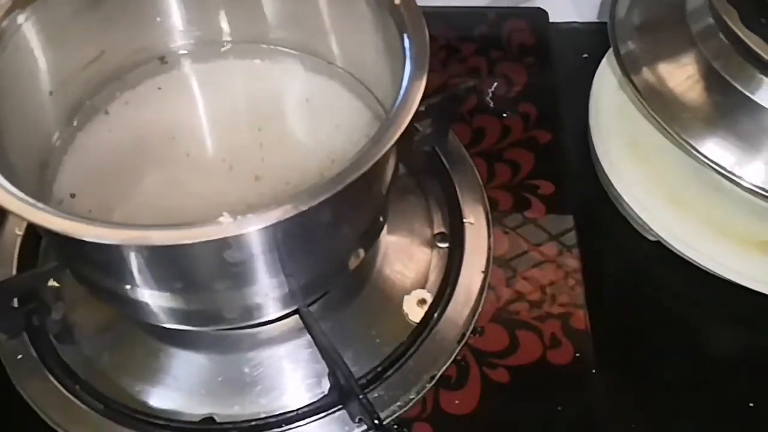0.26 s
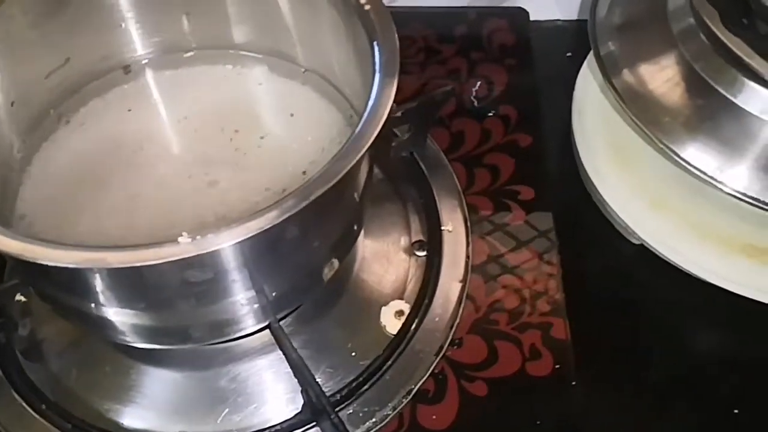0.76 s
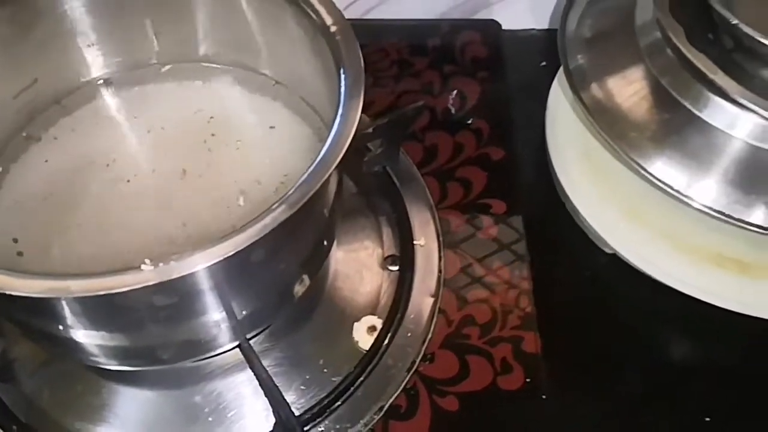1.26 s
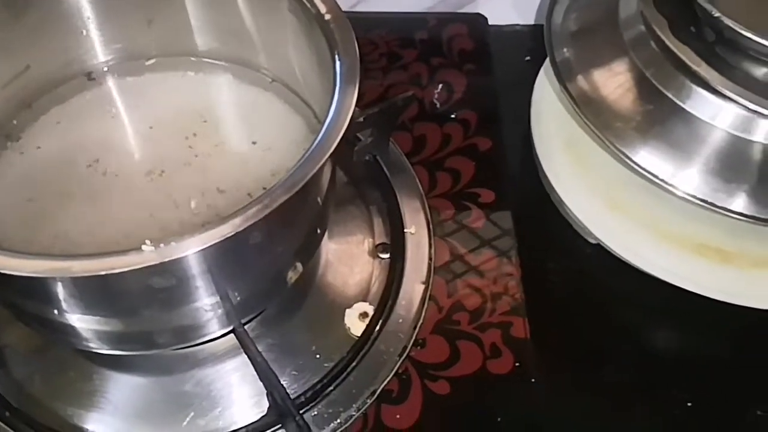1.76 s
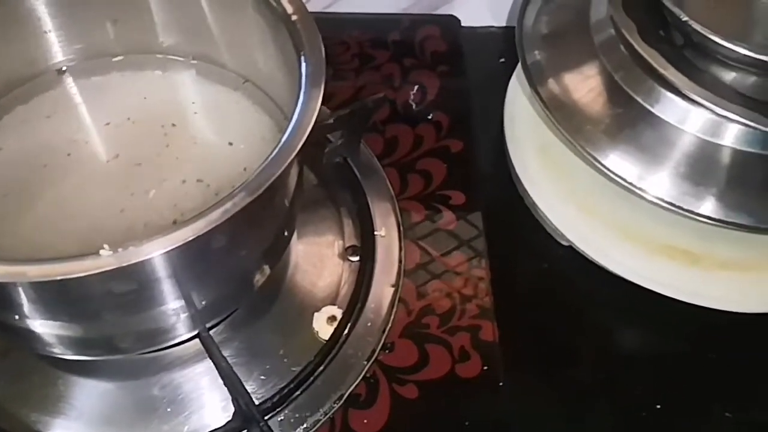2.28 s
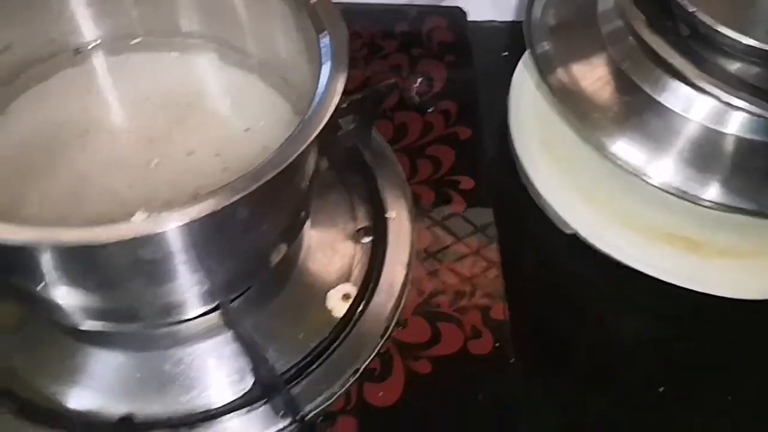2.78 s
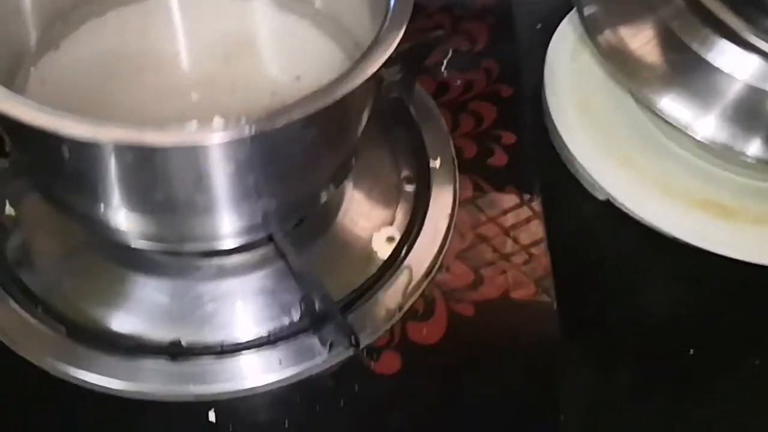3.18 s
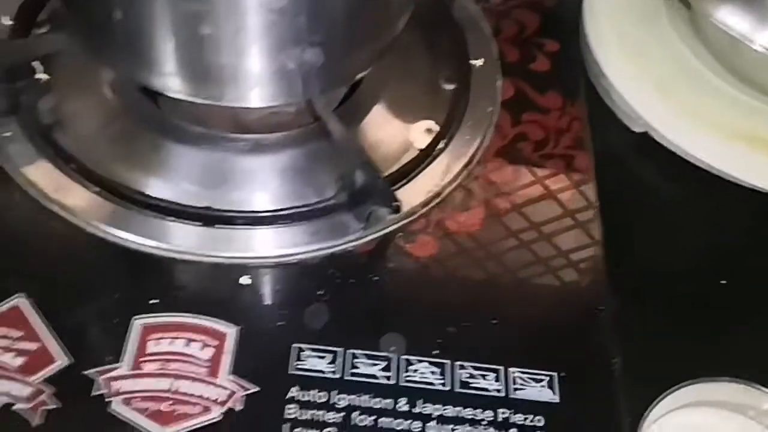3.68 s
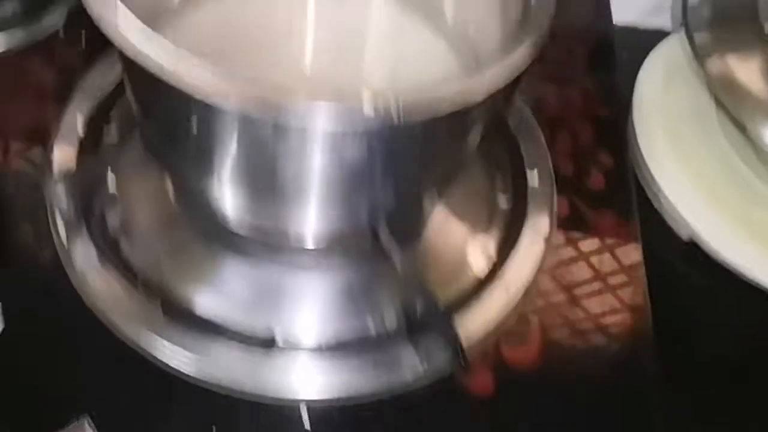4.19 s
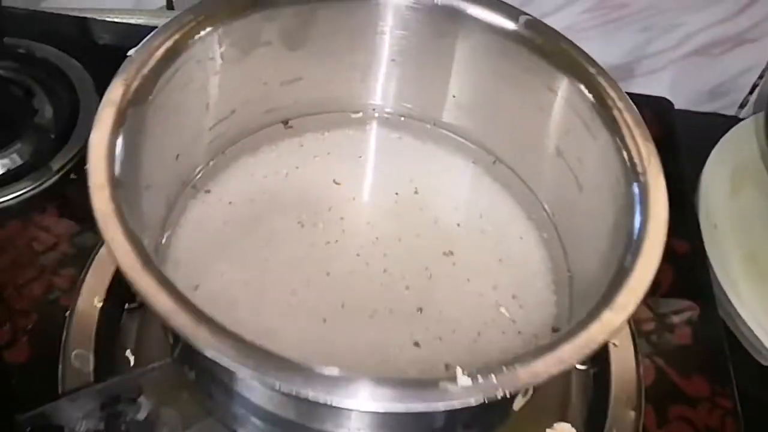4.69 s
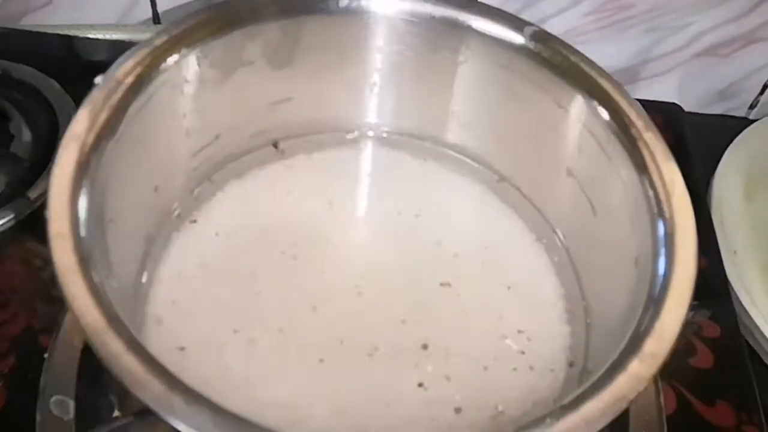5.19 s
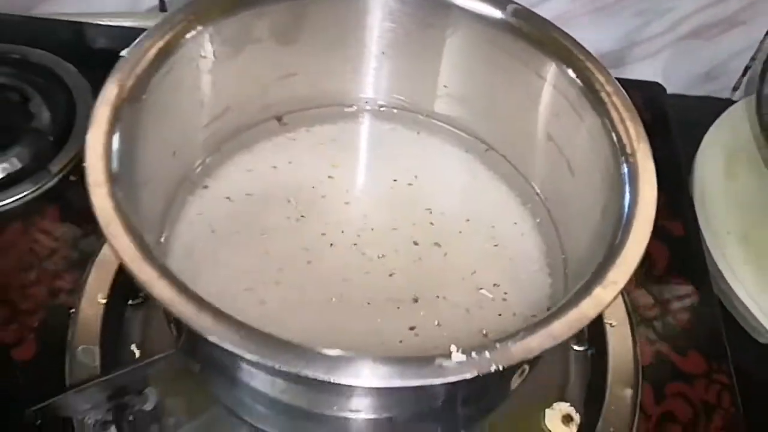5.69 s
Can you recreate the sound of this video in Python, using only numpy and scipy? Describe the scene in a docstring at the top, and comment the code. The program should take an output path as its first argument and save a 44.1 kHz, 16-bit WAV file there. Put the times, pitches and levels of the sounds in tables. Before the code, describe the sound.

Close in a tiled kitchen, sharp metallic igniter snaps and lighter knob clacks lead to a soft low whoomp of gas lighting.

```python
"""In a tiled kitchen, a gas stove is lit close to a mono phone microphone.
The piezo hammer snaps three times and the knob springs back twice: decaying modes and noise cracks with a room tail.
After the third snap the gas catches with a low thud of struck modes, then the flame throbs as a slow sine with rumble.
Ticks, a creak, rubs and a thin hiss surround it; clatter and a scrape sound further off, over soft air and hum."""
import sys
import numpy as np
from scipy import signal
from scipy.fft import rfft, irfft
from scipy.io import wavfile
from scipy.ndimage import uniform_filter1d

SR = 44100
rng = np.random.default_rng(int(sys.argv[2]) if len(sys.argv) > 2 else 0)


def wav_out(sig):
    """Save sig, one row per channel (or a flat mono array), as 16-bit PCM at SR to the path in sys.argv[1]."""
    wavfile.write(sys.argv[1], SR, np.round(np.clip(np.atleast_2d(sig).T, -1, 1) * 32767).astype(np.int16))


N = 262306
TIME = np.arange(N) / SR
AGE = TIME[:SR]  # the second that follows an onset

# reverberation of the kitchen, before stretching: (frequency [Hz], t60 [s])
KITCHEN = [(150, 0.66), (500, 0.6), (2000, 0.54), (4000, 0.42), (7000, 0.35), (14000, 0.32)]
# colour of the steady air: (frequency [Hz], relative level [dB])
AIR_COLOUR = [(15, -32.5), (25, -2), (103, -7.5), (135, -7), (176, -4), (278, -9), (344, -1.5), (383, -12),
              (515, -12), (1180, -5.5), (2240, -10), (3930, -28.5), (5420, -29), (7090, -40.5),
              (15000, -51.5)]
# lines of the faint hum: (frequency [Hz], level [dB])
HUM_LINES = [(188, -64.5), (339, -61)]

# clatter further off: (time [s], level [dB], rise time constant [s], t60 at 2 kHz [s], tilt [dB per octave],
# ring frequency [Hz], thump level [dB])
CLATTERS = [(-.06, -28.5, 0.057, 0.64, -2, 1567, -22.5), (3.305, -22, 0.064, 0.79, -0.5, 2088, -15.5),
            (5.25, -15.5, 0.023, 0.85, 1.73, 2500, -24), (5.875, -31, 0.19, 2.1, -2.5, 1292, -12)]
# colours of the clatter, its thump and the hollow scrape: (frequency [Hz], relative level [dB])
CLATTER_COLOUR = [(150, -19.5), (330, -10.5), (430, -13.5), (600, -8), (960, 0.5), (1220, -7), (1400, -1.5),
                  (2100, -1), (2800, -11), (3600, -17), (4700, -27.5), (5400, -24.5), (7000, -39.5),
                  (14000, -65.5)]
THUMP_COLOUR = [(110, -12), (160, 2.5), (220, 6), (280, -1), (600, -29.5), (4000, -71)]
SCRAPE_COLOUR = [(190, -7), (400, -17), (1000, -6.5), (1700, -1), (2000, -3.5), (2220, -16), (2600, 0),
                 (3050, -8.5), (3430, -22), (3900, -11), (4850, -21.5), (5500, -13), (6300, -34.5),
                 (7100, -28), (10000, -49), (15000, -65)]

# soft rubs of the hand on the stove: (time [s], level [dB], length [s], tilt [dB per octave])
RUBS = [(-.02, -57, .26, 0.5), (1.693, -50, .06, -2), (1.754, -62, .035, 3.5), (4.024, -66, .045, 4)]
# colour of a rub: (frequency [Hz], relative level [dB])
RUB_COLOUR = [(400, -3.5), (1200, 0.5), (2600, -3.5), (3800, -11), (5300, -9.5), (7500, -14.5),
              (10000, -27), (15000, -34)]
# thin tings of steel: (time [s], frequency [Hz], level [dB], t60 [s])
TINGS = [(1.773, 6710, -65.5, 0.51), (5.27, 9000, -52, 0.22)]
# resonances of the gas jets, each filtered twice: (frequency [Hz], width of one pass [Hz], level [dB])
JET_MODES = [(3600, 300, -1), (5650, 220, -3)]

# small ticks of the knob under the fingers: (time [s], level [dB], tilt [dB per octave])
TICKS = [(0.211, -43, 0), (.555, -40.5, -6.5), (1.183, -41, -2.5), (1.294, -46, 0.5), (1.410, -42.5, -5.5),
         (1.435, -28, 4), (1.712, -42.5, 0), (1.773, -50.5, 3.5), (3.053, -37, -4.5), (3.158, -50, -0.5),
         (3.623, -41, -3.5), (4.047, -49.5, 4), (5.847, -43.5, -3)]
# colour of a tick: (frequency [Hz], relative level [dB])
TICK_COLOUR = [(200, -21.5), (600, 0.5), (2300, 8), (4000, -3.5), (7000, -16), (14000, -39.5)]
# resonances of the creak, each filtered twice: (frequency [Hz], half the width of one pass [Hz], level [dB])
CREAK_MODES = [(275, 36, -1.5), (580, 47, 1)]

# puffs of burning gas: (time [s], level [dB], rise time constant [s])
PUFFS = [(5.067, -12.5, 0.018), (5.496, -31.5, 0.0015)]
# the hollow under the pot that they ring: (frequency [Hz], level [dB], t60 [s])
HOLLOW_MODES = [(52.1, -7, 0.59), (87, -4, 0.28), (111, -8, 0.55), (150, -1.5, 0.23), (165, -11, 0.67),
                (201.4, -1, 0.38)]

# piezo hammer strikes: (time [s], level [dB], room level [dB], tilt [dB per octave])
SNAPS = [(.7595, -2.5, -17, -1.3), (2.6133, -2.5, -17.5, -1), (5.0397, -1, -17, -2)]
# the knob springs back against its stop: (time [s], level [dB], room level [dB], tilt [dB per octave])
RETURNS = [(1.4374, -8.5, -24.5, 2), (3.6354, -9, -24.5, 2)]
# modes of the hammer housing, the knob's stop and the sheet-steel body: (frequency [Hz], level [dB], t60 [s])
HAMMER_MODES = [(2023, -10.5, 0.078), (2370, -13, 0.017), (2940, -9, .025), (3270, -11.5, 0.034),
                (4520, -15.5, .04), (5020, -14.5, 0.062), (7010, -16, .02)]
STOP_MODES = [(2677, -17.5, .03), (2790, -8.5, 0.047), (3550, -10.5, 0.036), (4400, -25, 0.048),
              (4730, -14, 0.044), (5080, -9, .045), (5760, -20.5, 0.053), (6610, -18.5, 0.066),
              (7120, -15, .05), (7800, -18.5, .05), (9240, -23.5, 0.077)]
BODY_MODES = [(275, -33, .4), (393, -25, .1), (525, -32, .3), (678, -23, .2), (846, -19, .14),
              (1007, -26, .35), (1128, -25, .3), (1359, -25, .2), (1530, -21, .16), (1723, -20, .35),
              (1961, -22, .45), (2083, -27, .5), (2293, -26, .35)]
# colours of the first crack and of the room's answer: (frequency [Hz], relative level [dB])
SNAP_CRACK = [(120, -25), (300, -11.5), (1000, -2), (2500, -1.5), (3800, -7), (5200, -3.5), (7200, -9.5),
              (10000, -20), (15000, -28.5)]
SNAP_ROOM = [(88, -70), (150, -34.5), (238, -23), (273, -9.5), (350, -20.5), (477, -13), (515, -8),
             (687, -6), (787, -8), (1400, -4), (1640, -4), (1770, -1), (3540, -13.5), (5400, -8.5),
             (15000, -35.5)]
RETURN_CRACK = [(100, -40), (300, 10.5), (600, -26.5), (1800, 5.5), (3000, 7.5), (5200, 9.5), (6200, -6),
                (8500, -2), (11000, -12.5), (15000, -16.5)]
RETURN_ROOM = [(88, -34), (150, -11.5), (589, 4), (701, 5), (787, -6), (1130, -2), (1430, 0.5), (1870, -7),
               (2810, -12), (3090, -12), (4910, -8), (6060, -15), (7080, -13), (9270, -19), (15000, -37)]


def undb(db):
    """Decibels to gain."""
    return 10 ** (np.asarray(db) / 20)


def unit(x):
    """Scale to rms 1."""
    return x / np.sqrt(np.mean(x ** 2))


def fade(t60):
    """Exponential decay, 60 dB down after t60 seconds."""
    return np.exp(-np.log(1000) * AGE / t60)


def swell(rise):
    """Smooth onset with a time constant in seconds."""
    return 1 - np.exp(-AGE / rise)


def envelope(start, attack, hold=np.inf, release=1, sag_db_per_s=0):
    """Gain that rises at start, sags throughout and dies away after the hold; times in s."""
    age = np.maximum(TIME - start, 0)
    rise = 1 - np.exp(-age / attack)
    dying = np.exp(-np.maximum(age - hold, 0) / release)
    return rise * undb(-sag_db_per_s * age) * dying


def walk(rate):
    """Random wander, gliding between values about rate times a second, with a spread near 1."""
    step = int(SR / rate)
    values = rng.standard_normal(N // step + 1)
    return uniform_filter1d(np.repeat(values, step), step)[:N]


def add(track, s, sound):
    """Mix a sound into the track at time s."""
    start = int(round(s * SR))
    lo, hi = max(start, 0), min(start + len(sound), N)
    track[lo:hi] += sound[lo - start:hi - start]


def log_freqs(size):
    """Octave position of every bin of a spectrum."""
    return np.log2(np.maximum(np.fft.rfftfreq(size, 1 / SR), 1))


def colour(x, points, tilt_db=0):
    """Shape x by a spectral curve, tilted within two octaves of 2 kHz, and scale it to rms 1."""
    octave = log_freqs(len(x))
    hz, db = np.transpose(points)
    gain_db = np.interp(octave, np.log2(hz), db)
    gain_db += tilt_db * np.clip(octave - np.log2(2000), -2, 2)
    gain_db -= 12 * np.maximum(np.log2(hz[0]) - octave, 0)  # 12 dB per octave below the first point
    return unit(irfft(rfft(x) * undb(gain_db), len(x)))


def resonate(x, hz, width):
    """Two equal resonances in a row, gain 1 at their centre."""
    b, a = signal.iirpeak(hz, hz / width, fs=SR)
    return signal.lfilter(b, a, signal.lfilter(b, a, x))


def ring(modes, scatter=0.):
    """Struck modes as decaying sines; scatter spreads their starting phases in cycles."""
    out = np.zeros(SR)
    for hz, db, t60 in modes:
        cycles = hz * AGE + scatter * rng.random()
        out += undb(db) * fade(t60) * np.sin(2 * np.pi * cycles)
    return out


def die_away(x, stretch):
    """Let each band of x fade with the kitchen's reverberation time, multiplied by stretch."""
    octave, spectrum = log_freqs(len(x)), rfft(x)
    hz, t60 = np.transpose(KITCHEN)
    out = np.zeros(len(x))
    for pick, band_t60 in zip(np.eye(len(hz)), t60):
        weight = np.interp(octave, np.log2(hz), pick)  # overlapping bands that sum to 1
        out += irfft(spectrum * weight, len(x)) * fade(stretch * band_t60)
    return out


def background():
    """Soft kitchen air as coloured noise that wavers a little, with a hum of narrow noise bands."""
    air = colour(rng.standard_normal(N), AIR_COLOUR) * undb(-46.5 + 1.1 * walk(4))
    hum = np.zeros(N)
    for hz, db in HUM_LINES:
        b, a = signal.iirpeak(hz, hz / 5.1, fs=SR)
        hum += undb(db) * unit(signal.lfilter(b, a, rng.standard_normal(N)))
    return air + hum


def far_clatter():
    """Distant knocks, blurred by the room into swells that darken as they fade."""
    out = np.zeros(N)
    for s, db, rise, t60, tilt_db, ring_hz, thump_db in CLATTERS:
        rattle = colour(rng.standard_normal(SR), CLATTER_COLOUR, tilt_db)
        note = unit(resonate(rng.standard_normal(SR), ring_hz, 400))
        thump = colour(rng.standard_normal(SR), THUMP_COLOUR)
        knock = rattle + undb(-11.0) * note + undb(thump_db) * thump
        # a little comes straight, the rest builds up off the walls
        arrival = 0.16 * swell(rise / 20) + 0.87 * swell(rise)
        add(out, s, undb(db) * die_away(knock, t60 / KITCHEN[2][1]) * arrival)
    return out


def far_scrape():
    """Something hollow scrapes a little way off: coloured noise that swells and fades in the room."""
    out = np.zeros(N)
    t60_at_2khz = 0.6
    scrape = colour(rng.standard_normal(SR), SCRAPE_COLOUR)
    add(out, 4.359, undb(-25.5) * die_away(scrape, t60_at_2khz / KITCHEN[2][1]) * swell(0.053))
    return out


def rubs():
    """Skin drags over the stove in dense little grains, some 2500 a second."""
    out = np.zeros(N)
    for s, db, length, tilt_db in RUBS:
        grains = (rng.random(N) < 2500 / SR) * rng.standard_normal(N)
        stroke = envelope(s, attack=.01, hold=length, release=.025)
        out += undb(db) * colour(grains, RUB_COLOUR, tilt_db) * stroke
    return out


def tings():
    """Single high notes of the steel pot, each a decaying sine."""
    out = np.zeros(N)
    for s, hz, db, t60 in TINGS:
        add(out, s, ring([(hz, db, t60)]) * swell(.01))
    return out


def jets():
    """Gas whistles softly through the jets from the moment the valve opens: resonant noise."""
    flow = rng.standard_normal(N)
    hiss = sum(undb(db) * resonate(flow, hz, width) for hz, width, db in JET_MODES)
    return undb(-70.5) * unit(hiss) * envelope(4.1, attack=.1)


def knob_ticks():
    """Light ticks of the knob: short noise bursts with a little room."""
    out = np.zeros(N)
    for s, db, tilt_db in TICKS:
        noise = colour(rng.standard_normal(SR), TICK_COLOUR, tilt_db)
        tick = noise * fade(.05)
        room = undb(-7) * die_away(noise, stretch=.6)
        add(out, s, undb(db) * (tick + room) * swell(.0006))
    return out


def knob_creak():
    """The knob is pushed in: it grips at once, and random slips ring two resonances with a dry scuff."""
    slips_per_s = 490
    slips = (rng.random(N) < slips_per_s / SR) * rng.uniform(.2, 1, N)
    creak = sum(undb(db) * resonate(slips, hz, 2 * width) for hz, width, db in CREAK_MODES)
    scuff = undb(-5.5) * colour(slips, TICK_COLOUR, tilt_db=-5.5)
    push = envelope(.209, attack=.005, hold=.08, release=0.027, sag_db_per_s=25)
    return undb(-39) * push * (unit(creak) + scuff)


def gas_catches():
    """The gas catches in puffs: low modes boom under the pot with a gust of dark noise."""
    out = np.zeros(N)
    gust_colour = [(50, -5.5), (190, -10), (300, -22.0), (1500, -34), (8000, -87.0)]
    for s, db, rise in PUFFS:
        gust = colour(rng.standard_normal(SR), gust_colour) * fade(0.25)
        boom = undb(-2.5) * ring(HOLLOW_MODES) + undb(-2.0) * gust
        add(out, s, undb(db) * boom * swell(rise))
    return out


def flame():
    """The fresh flame throbs and flares, sags as the gathered gas burns off, then drops to a steady burn."""
    start_s, attack_s = 5.1, .015
    throb_hz, throb_start_s = 15.85, 5.088
    throb = np.sqrt(2) * np.sin(2 * np.pi * throb_hz * (TIME - throb_start_s))
    rumble_colour = [(20, -2.5), (50, -3.5), (120, -7.0), (250, -12.5), (600, -30), (4000, -76.5)]
    rumble = colour(rng.standard_normal(N), rumble_colour)
    flare = undb(-25) * envelope(start_s, attack_s, hold=.48, release=0.035, sag_db_per_s=23)
    steady = undb(-43) * envelope(start_s, attack_s)
    return (flare + steady) * (throb + undb(-17.5) * rumble)


def blows(events, modes, crack_colour, room_colour, crack_db, crack_t60, tick_db, body_db,
          stretch, room_rise, sing_db, sing_width_hz):
    """Metal hits metal: the part rings briefly, the steel body takes it up and the room answers."""
    out = np.zeros(N)
    part = ring(modes, scatter=0.91) * swell(0.00019)
    body = ring(BODY_MODES, scatter=0.94) * swell(0.0029)  # the heavy sheet takes a moment to get going
    contact, walls = rng.standard_normal((2, SR))  # the same parts and the same walls at every blow
    # the room holds the part's own notes on after the part has stopped
    sing = unit(sum(undb(db) * resonate(walls, hz, sing_width_hz) for hz, db, _ in modes))
    bite = (undb(crack_db) * fade(crack_t60) + undb(tick_db) * fade(.012)) * swell(0.00059)
    for s, db, room_db, tilt_db in events:
        own_contact, own_walls = rng.standard_normal((2, SR))  # what differs from blow to blow
        crack = colour(contact + 0.45 * own_contact, crack_colour, tilt_db) * bite
        answer = colour(walls + 0.5 * own_walls, room_colour, tilt_db) + undb(sing_db) * sing
        room = die_away(answer, stretch) * swell(room_rise)
        direct = part + crack + undb(body_db) * body
        add(out, s, undb(db) * direct + undb(room_db) * room)
    return out


def knob_returns():
    """The knob springs back on its stop: a lighter, brighter blow."""
    return blows(RETURNS, STOP_MODES, RETURN_CRACK, RETURN_ROOM,
                 crack_db=-9.0, crack_t60=0.06, tick_db=-29.5, body_db=-8.5,
                 stretch=0.95, room_rise=0.0034, sing_db=-9.5, sing_width_hz=300)


def hammer_snaps():
    """The piezo hammer strikes: a heavy snap that rings its housing."""
    return blows(SNAPS, HAMMER_MODES, SNAP_CRACK, SNAP_ROOM,
                 crack_db=-7, crack_t60=0.086, tick_db=-9, body_db=1.5,
                 stretch=1.28, room_rise=0.013, sing_db=-18.0, sing_width_hz=900)


def scene():
    """Everything reaches one microphone, the same on both channels."""
    mono = background() + far_clatter() + far_scrape()
    mono += rubs() + tings() + jets() + knob_ticks() + knob_creak()
    mono += gas_catches() + flame() + knob_returns() + hammer_snaps()
    return np.array([mono, mono])


def suppress(x, depth_db, margin_db, size=512):
    """Noise suppressor: bands close to their own resting level are turned down, so tails end early."""
    spectra = signal.stft(x, nperseg=size)[2]
    power = uniform_filter1d(np.abs(spectra) ** 2, size=9, axis=1)  # smoothed over frequency
    power = uniform_filter1d(power, size=5, axis=2)  # and over time
    resting = np.quantile(power, 1 / 4, axis=2, keepdims=True)
    threshold = resting * undb(margin_db) ** 2
    gain = undb(depth_db * threshold / (power + threshold))
    return signal.istft(spectra * gain, nperseg=size)[1][:, :N]


def record(dry):
    """The phone turns down steady noise, rounds off the sharpest peaks and cuts the top."""
    quiet = suppress(dry, depth_db=-5.0, margin_db=9.5)
    rounded = quiet / (1 + (quiet / .94) ** 6) ** (1 / 6)
    top_hz = 15400
    return signal.sosfilt(signal.ellip(10, .1, 80, top_hz, fs=SR, output="sos"), rounded)


dry = scene()
out = record(dry)
wav_out(out)
```